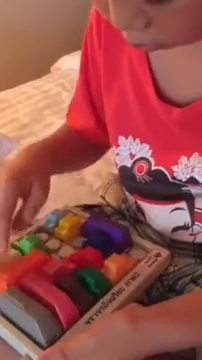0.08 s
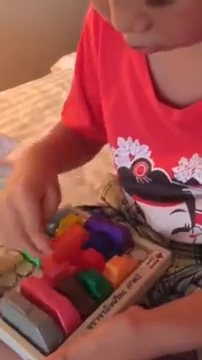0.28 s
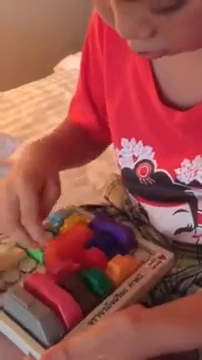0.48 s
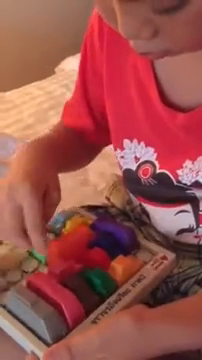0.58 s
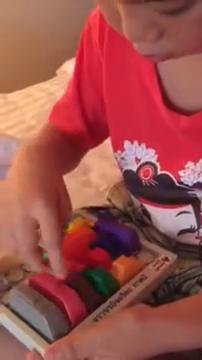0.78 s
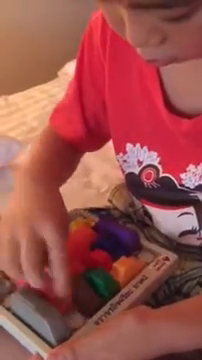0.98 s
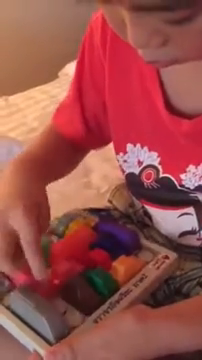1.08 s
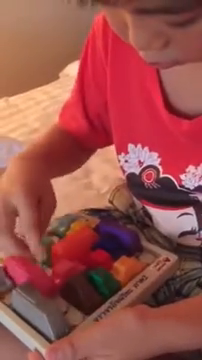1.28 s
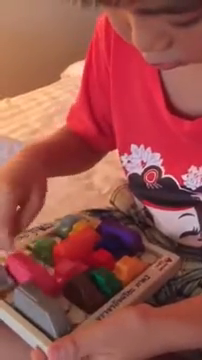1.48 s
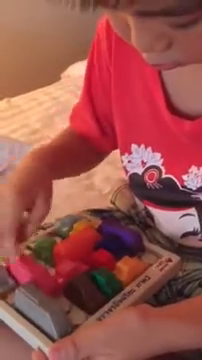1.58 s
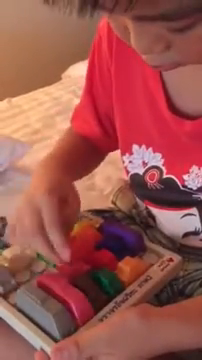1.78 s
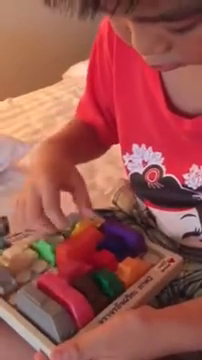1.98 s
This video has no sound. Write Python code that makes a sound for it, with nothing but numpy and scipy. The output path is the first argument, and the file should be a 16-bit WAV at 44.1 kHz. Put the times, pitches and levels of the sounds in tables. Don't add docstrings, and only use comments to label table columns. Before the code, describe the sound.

Small hollow plastic pieces clatter and clack on a plastic tray in two bursts over low hum

```python
import sys
import numpy as np
from scipy import signal
from scipy.fft import rfft, irfft
from scipy.io import wavfile
from scipy.ndimage import uniform_filter1d

SR = 44100
rng = np.random.default_rng(int(sys.argv[2]) if len(sys.argv) > 2 else 0)


def wrap_up_sound(samples):
    columns = np.atleast_2d(samples).T
    tamed = np.clip(columns, -1, 1)
    steps = np.round(tamed * 32767).astype(np.int16)
    wavfile.write(sys.argv[1], SR, steps)


def gain_from_db(level_db):
    decades = np.asarray(level_db, float) / 20
    return 10 ** decades


N = 90405
T = np.arange(N) / SR
DIRECTIONS = 6


def unit(x):
    return x / np.sqrt(np.mean(x ** 2))


def curve(rows):
    return np.interp(T, *np.array(rows).T)


def walk(rate):
    k = int(SR / rate)
    return unit(uniform_filter1d(uniform_filter1d(rng.standard_normal(N), k), k))


def coloured(points, count):
    f = np.arange(1, count // 2 + 2) * SR / count
    hz, db = np.array(points).T
    gain = gain_from_db(np.interp(np.log(f), np.log(hz), db, left=-90, right=-90))
    return unit(irfft(rfft(rng.standard_normal(count)) * gain, count))


def ring(hz, db, t60, t):
    hz, db, t60 = (np.asarray(v, float)[:, None] for v in (hz, db, t60))
    return gain_from_db(db - 60 * t / t60) * np.sin(2 * np.pi * hz * t)


def tone(hz, db):
    turns = np.cumsum(hz) / SR + rng.random()
    return np.sqrt(2) * gain_from_db(db) * np.sin(2 * np.pi * turns)


def chatter(length):
    impacts_per_s, scatter_db, rise_s = 12000, 1.5, 0.0004
    die_share, sag = 0.5, 0.3
    t = np.arange(4096) / SR
    chance = rng.random((2, len(t)))
    rise = np.minimum(t / rise_s + 0.35, 1)
    overtime = np.maximum(t / max(length, 5e-4) - 1, 0)
    shape = rise * np.exp(-overtime / die_share - sag * t / length)
    taps = (chance[0] < impacts_per_s / SR) | (t == 0)
    strength = gain_from_db(-scatter_db * np.log(1 - chance[1]))
    signs = np.sign(rng.random((DIRECTIONS, len(t))) - 0.5)
    return taps * signs * strength * shape


def piece_ring(hz, t):
    ratios = (1, 0.94, 1.3, 10)
    mode_db = (15.5, 11, 9, -1.5)
    mode_t60 = (0.032, 0.027, 0.006, .008)
    detune = 1 + 0.035 * rng.standard_normal(4) * (np.arange(4) > 0)
    return ring(hz * np.array(ratios) * detune, mode_db, np.array(mode_t60) * (2000 / hz) ** 2, t).sum(axis=0)


def tray_ring(tilt_db, t):
    # frequency in Hz, level in dB.
    spectrum = [(300, -37), (800, -21), (1300, -7.5), (2100, 4), (4200, 0), (6000, -3.5), (11000, -8),
                (15500, -7)]
    scatter_db, t60_s, t60_slope = 2, 0.012, -0.4
    hz = ((np.arange(200) + rng.random(200)) / 200) ** 1.4 * 16000 + 300
    points_hz, points_db = np.array(spectrum).T
    db = np.interp(np.log(hz), np.log(points_hz), points_db) + tilt_db * np.log2(hz / 2000)
    modes = ring(hz, db, t60_s * (hz / 2000) ** t60_slope, t)
    luck = rng.standard_normal((DIRECTIONS, 200))
    mix = np.sign(luck) * gain_from_db(scatter_db * np.roll(luck, shift=1, axis=1))
    return mix @ modes


def pieces():
    # start in seconds, peak level in dB, piece pitch in Hz,
    # brightness in dB per octave, chatter length in seconds.
    first_hits = [(0.229, -60.5, 2000, 0, 0.023), (0.2476, -15, 1770, 0, 0.0039),
                  (.256, -22, 2400, -2, 0.013), (0.2906, -11, 1825, 1, .004), (0.293, -17, 1980, -2, 0.041),
                  (0.303, -10, 1840, -2, 0.0018), (0.321, -16.5, 1690, -6, 0.0048),
                  (0.3309, -11.5, 1833, 0, 0.0078), (0.3539, -5.5, 2116, 1, 0.0056),
                  (.369, -23.5, 2100, 6, 0.0033), (0.474, -35.5, 2190, -4.5, 0.0025),
                  (0.5115, -44.5, 1947, -8, 0.0041)]
    later_hits = [(0.971, -55, 2000, -1, 0.1), (.9842, -42.5, 1970, -1, 0.0018),
                  (1.001, -40, 1870, -9.5, 0.013), (1.034, -29, 2200, -2.5, 0.029),
                  (1.0703, -13.5, 2880, 1, 0.0019), (1.0745, -12.5, 2067, -2.5, 0.0088),
                  (1.083, -19, 2130, 0, 0.016), (1.1037, -13, 2356, 6.5, 0.0018),
                  (1.1063, -7.5, 1849, 0, 0.0041), (1.116, -19.5, 1963, -2, 0.0073),
                  (1.3096, -31, 3240, -3.5, 0.0048), (1.316, -43.5, 2530, -8, 0.011),
                  (1.648, -50.5, 1413, -1.5, 0.038), (1.664, -15.5, 3210, 2, 0.0073),
                  (1.667, -15.5, 2390, -7.5, 0.0067), (1.7032, -25, 2130, -0.5, 0.0053),
                  (1.7116, -15, 2018, -1.5, 0.0096), (1.7252, -18.5, 2316, -2.5, 0.0095),
                  (1.7493, -5.5, 4000, 2.5, 0.0047), (1.751, -12, 2436, -8, 0.0042),
                  (1.767, -22.5, 2356, -5.5, 0.009), (1.965, -60, 4500, -3, 0.12),
                  (1.9674, -57, 2140, -13.5, 0.0057)]
    piece_db_per_db = 0.76
    radiates_above_hz, thud_db = 693, -6
    out = np.zeros((DIRECTIONS, N + 9000))
    t = np.arange(2048) / SR
    for start, db, hz, tilt_db, length in first_hits + later_hits:
        body = tray_ring(tilt_db, t) + piece_ring(hz, t) * gain_from_db(piece_db_per_db * db)
        hit = signal.fftconvolve(chatter(length), body, axes=1)
        peak_power = 2 * np.max(uniform_filter1d(hit ** 2, size=88), axis=1, keepdims=True)
        i = int(start * SR)
        out[:, i:i + hit.shape[1]] += hit * gain_from_db(db) / np.sqrt(peak_power)
    out = out[:, :N]
    highpass = signal.butter(4, radiates_above_hz, "high", fs=SR, output="sos")
    return signal.sosfilt(highpass, out) + gain_from_db(thud_db) * out


def walls():
    # start in seconds, frequency in Hz, level in dB, decay time in seconds.
    wall_rings = [
        (.356, 2100, -22, .2),
        (.357, 2050, -39.5, .42),
        (0.355, 4135, -26, .06),
        (1.109, 1915, -46, .25),
        (1.752, 2390, -29, .12),
        (1.751, 4400, -18, .05),
    ]
    out = 0
    for start, hz, db, t60 in wall_rings:
        t = np.maximum(T - start, 0)
        onset = np.minimum(t / 0.002, 1)
        level_db = db - 60 * t / t60 + 2.5 * walk(50)
        out = out + onset * tone(hz * (1 + 0.002 * walk(90)), level_db)
    return out


def room(sides):
    # centre in Hz, decay time in seconds, level in dB.
    bands = [(700, 0.15, -13), (1400, 0.17, -11), (2200, 0.3, -15.5), (4000, 0.19, -10), (7000, 0.2, -10.5),
             (12000, .2, -9.5)]
    gap_s = 0.003
    late_db, late_stretch = -26, 2.83
    t = np.arange(22050) / SR
    out = 0
    for side in sides:
        tail = 0
        for hz, t60, db in bands:
            band = coloured([(hz / 4, -40), (hz / 1.3, 0), (hz, 0), (hz * 4, -40)], count=len(t))
            early = gain_from_db(db - 44 - 60 * t / t60)
            late = gain_from_db(db - 43.5 + late_db - 60 * t / (t60 * late_stretch))
            tail = tail + band * (early + late)
        out = out + signal.fftconvolve(side, tail * np.clip(t / gap_s, 0, 1))[:N]
    return out


def motor():
    # frequency in Hz, rms level in dB.
    lines = [(57.5, -47.5), (115, -33.5), (144, -55), (158.5, -50.5), (173, -53)]
    stops_s, fade_s = 1.53, 0.03
    wobble_db, wobble_per_s, drift = 1.5, 9, 0.002
    speed = 1 + drift * walk(2.7)
    on = np.exp(-np.maximum(T - stops_s, 0) / fade_s)
    return on * sum(tone(hz * speed, db + wobble_db * walk(wobble_per_s)) for hz, db in lines)


def low_hum():
    # time in seconds, level in dB.
    hum_level = [(0, -40.5), (.5, -47.5), (1.0, -33), (1.5, -56), (1.7, -46), (1.9, -48.5), (2.0, -48),
                 (2.05, -39)]
    return tone(96.4 * (1 + 0.02 * walk(2.5)), curve(hum_level) + 0.5 * walk(8))


def building_rumble():
    # frequency in Hz, density in dB per Hz.
    spectrum = [(20, -25), (35, -16), (55, -6.5), (100, 4), (160, -4), (220, -13.5), (300, -35.5)]
    # time in seconds, level in dB.
    rumble_level = [(0, -47.5), (1.5, -44), (1.6, -43), (1.86, -48), (1.93, -55), (2.0, -42), (2.05, -45)]
    return coloured(spectrum, count=N) * gain_from_db(curve(rumble_level))


def room_air():
    # frequency in Hz, density in dB per Hz.
    spectrum = [(160, -23.5), (210, -6), (330, -16.5), (600, -20), (1300, -20.5), (2000, -24.5),
                (3500, -34.5), (15500, -44.5)]
    return coloured(spectrum, count=N) * gain_from_db(-60 + 0.8 * walk(2.7))


def thin_whine():
    middle_s, span_s = 1.57, 0.12
    fade_db = 9 * ((T - middle_s) / span_s) ** 2
    return tone(13900 * (1 + 0.004 * walk(60)), -85 + 3 * walk(39.85) - fade_db)


def scene():
    near = pieces()
    clatter = near[0] + walls() + room(near[1:])
    background = low_hum() + building_rumble() + room_air() + thin_whine()
    return (clatter + motor() + background)[None]


def roll_off(x):
    return signal.sosfilt(signal.butter(12, 16470, fs=SR, output="sos"), x)


def record(dry):
    limit, shelf_hz, top_hz = 1.1, 15300, 16300
    limited = np.tanh(dry / limit) * limit
    f = np.arange(N // 2 + 1) * SR / N
    top_db = np.interp(f, [shelf_hz, shelf_hz + 150, top_hz, top_hz + 150], [-3, -24, -32.5, -91])
    mix = irfft(rfft(limited) * gain_from_db(top_db), N)
    return roll_off(mix)


dry = scene()
out = record(dry)
wrap_up_sound(out)
```